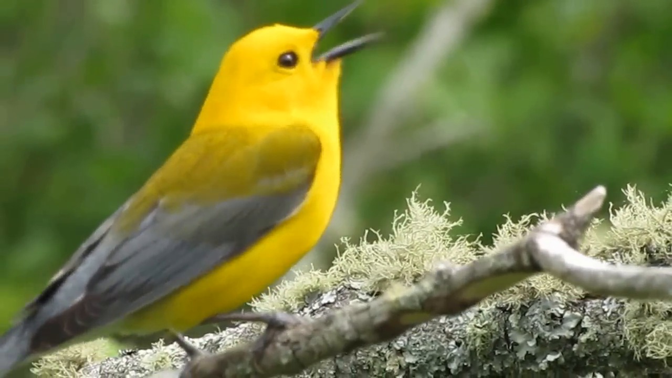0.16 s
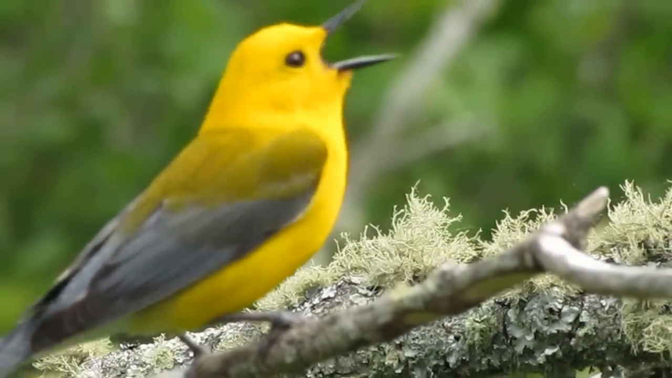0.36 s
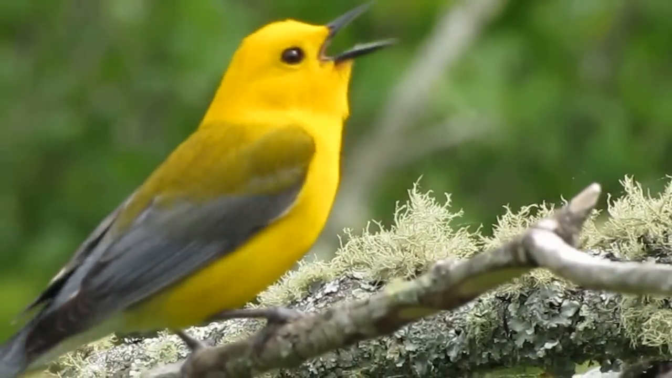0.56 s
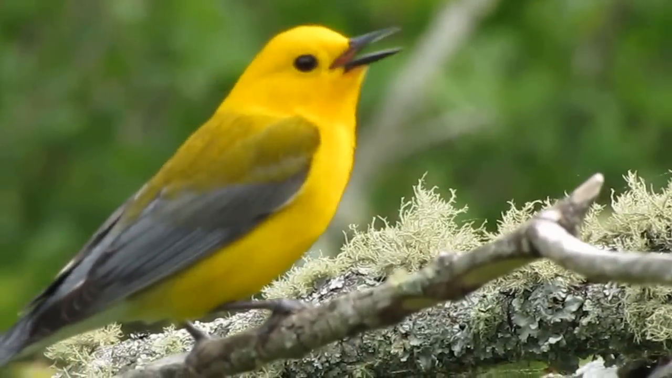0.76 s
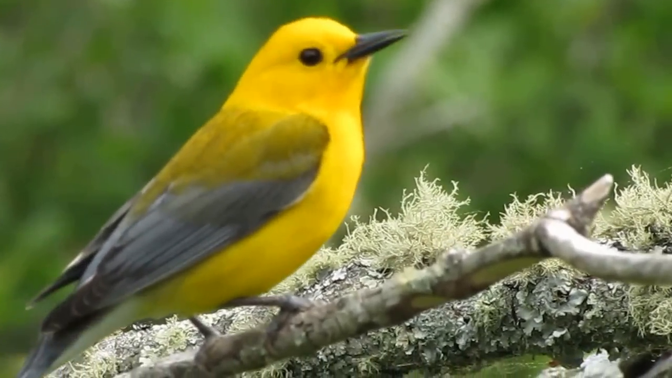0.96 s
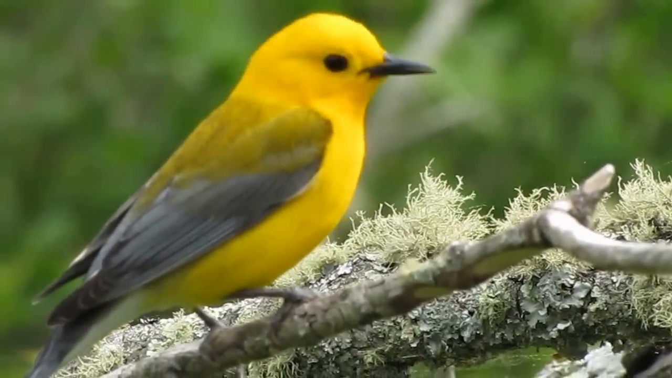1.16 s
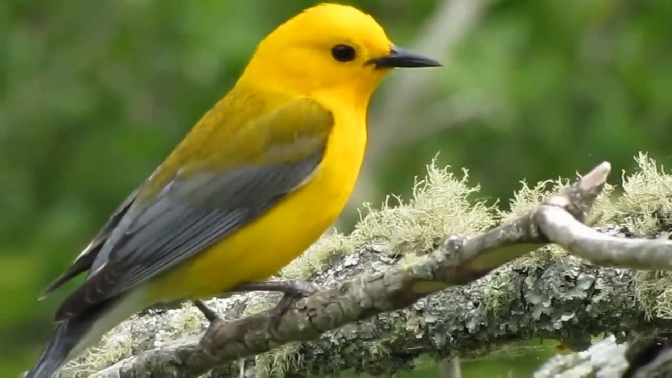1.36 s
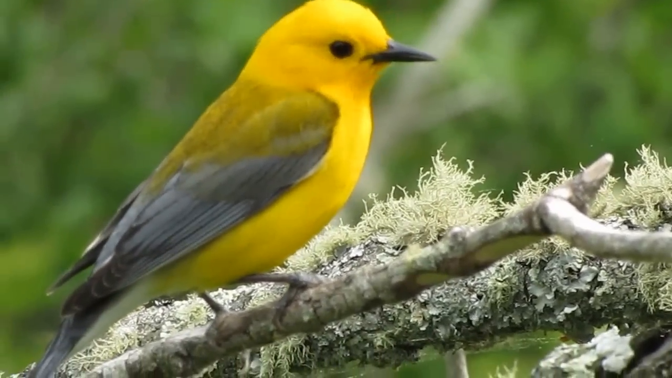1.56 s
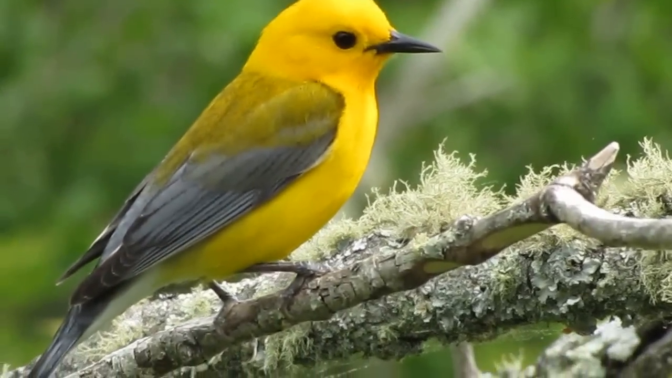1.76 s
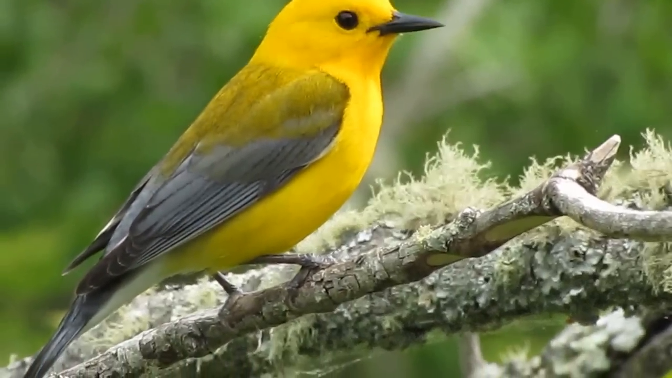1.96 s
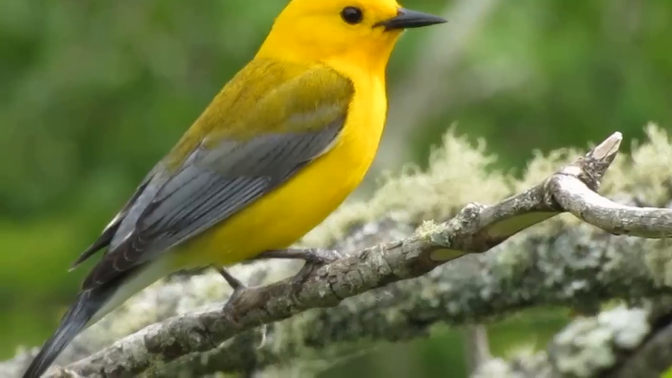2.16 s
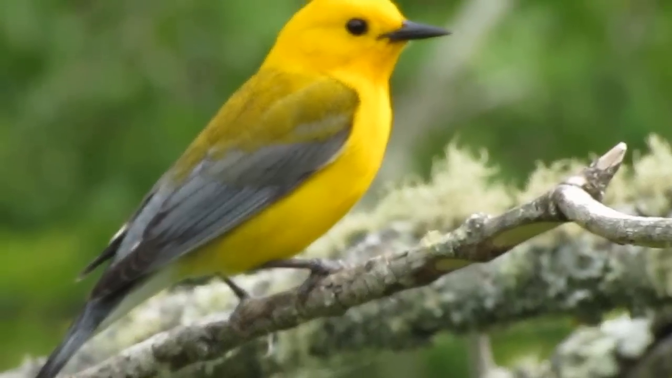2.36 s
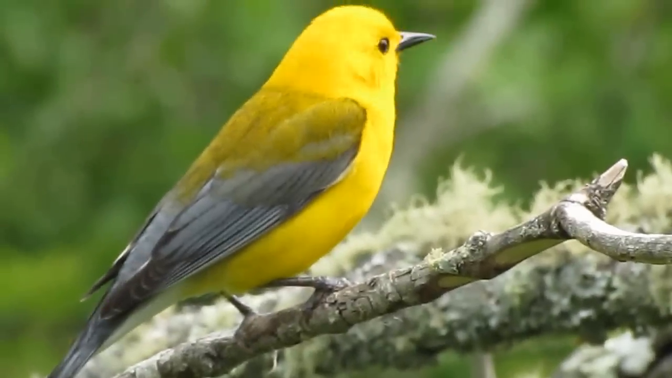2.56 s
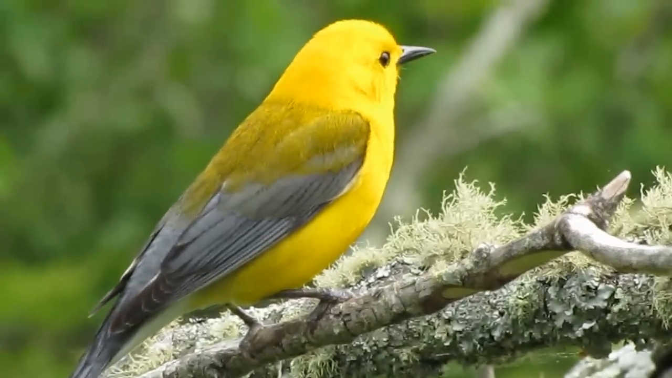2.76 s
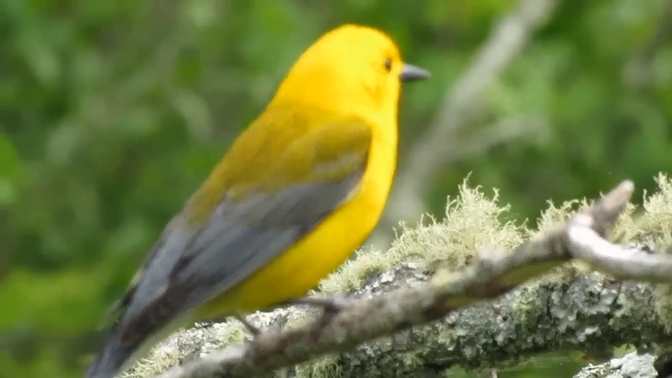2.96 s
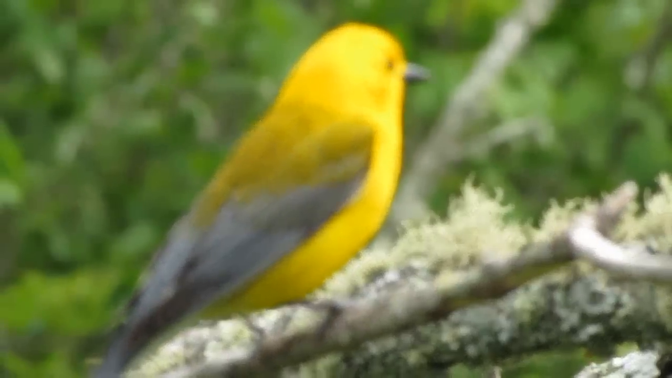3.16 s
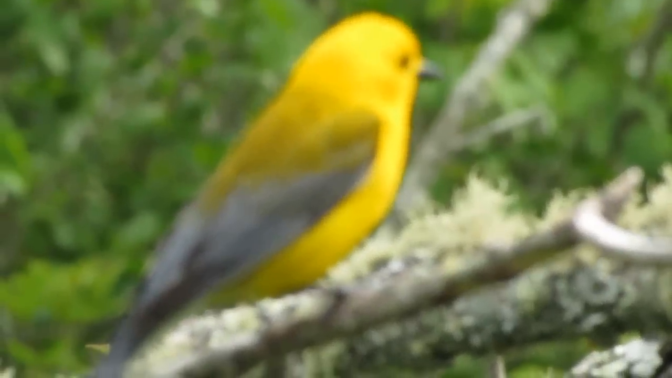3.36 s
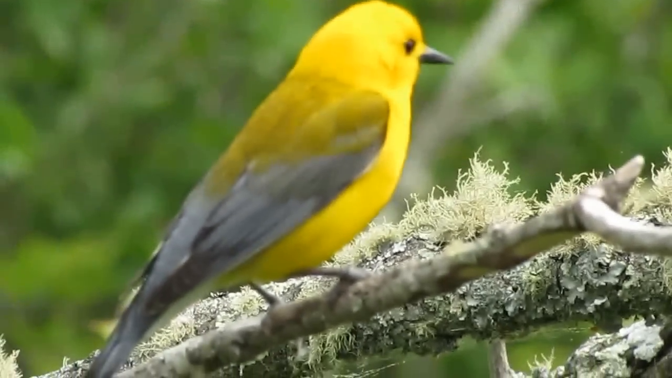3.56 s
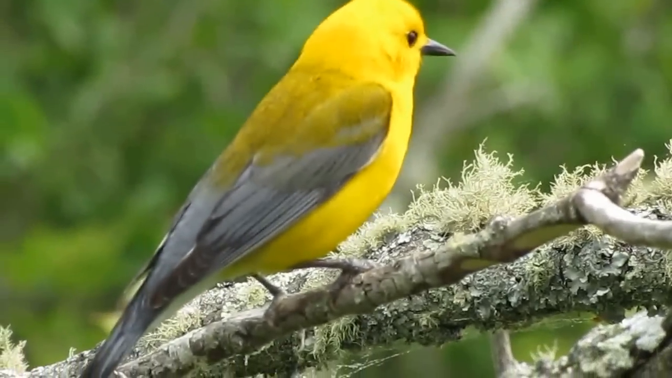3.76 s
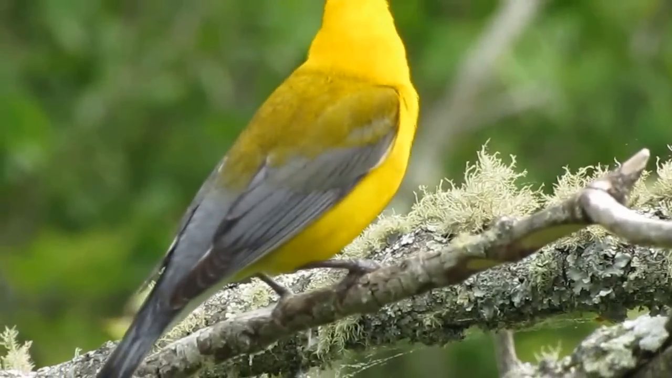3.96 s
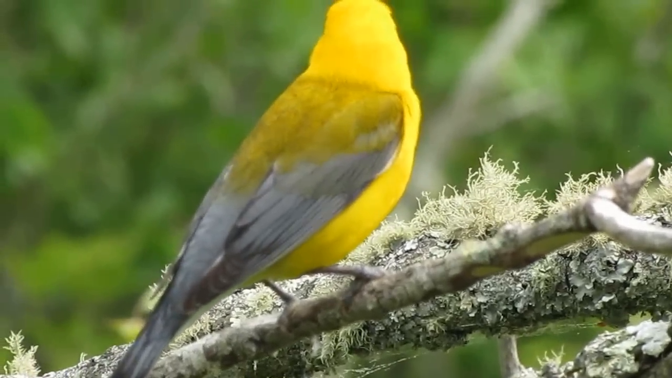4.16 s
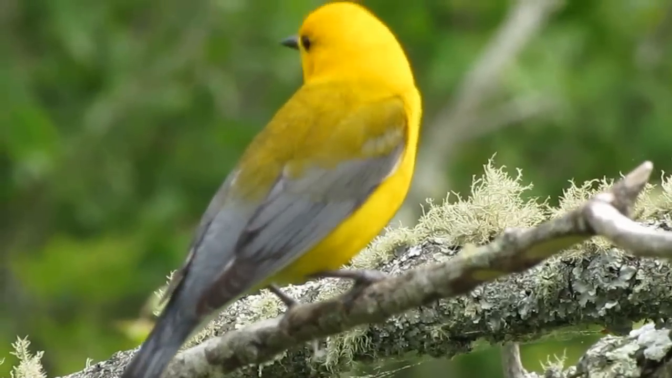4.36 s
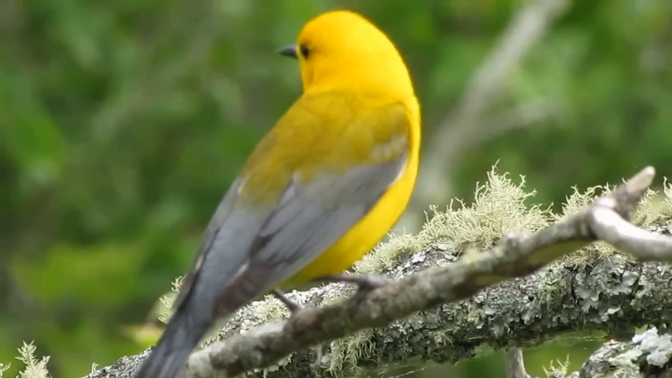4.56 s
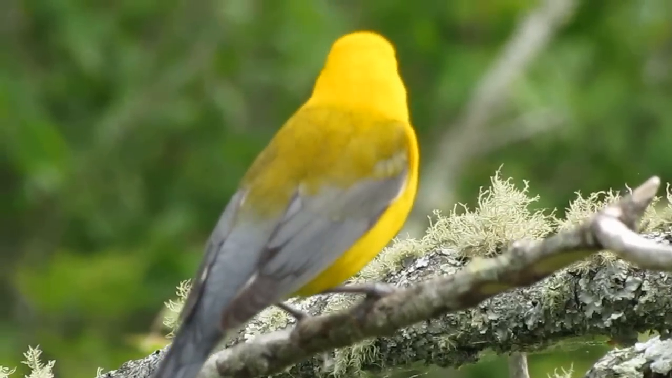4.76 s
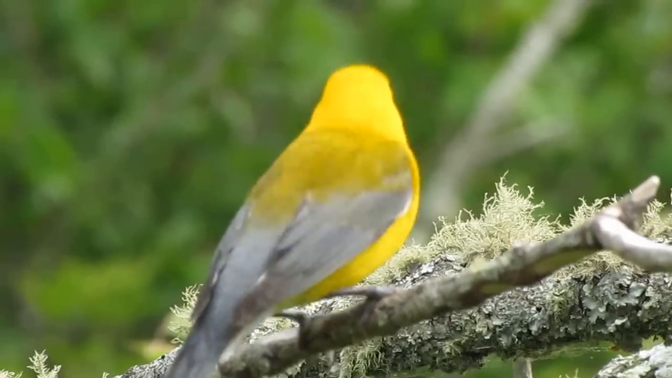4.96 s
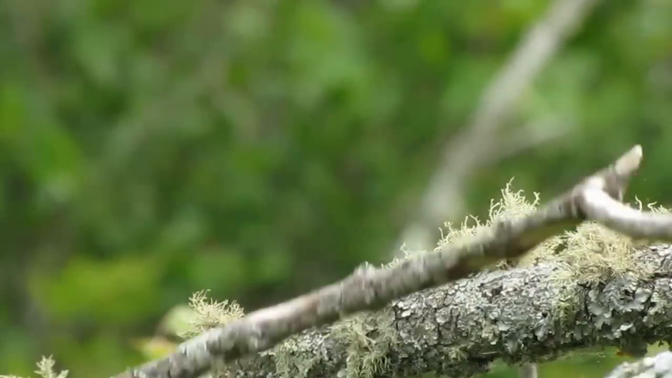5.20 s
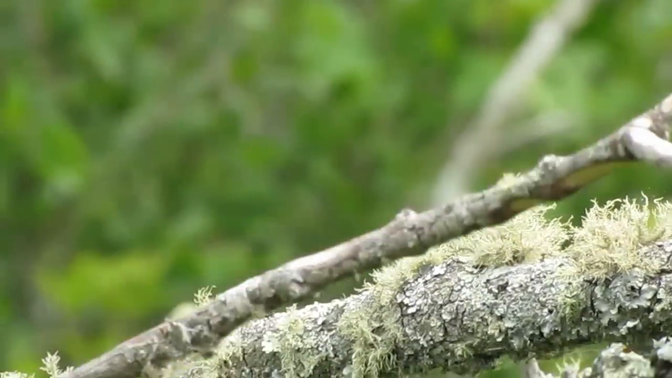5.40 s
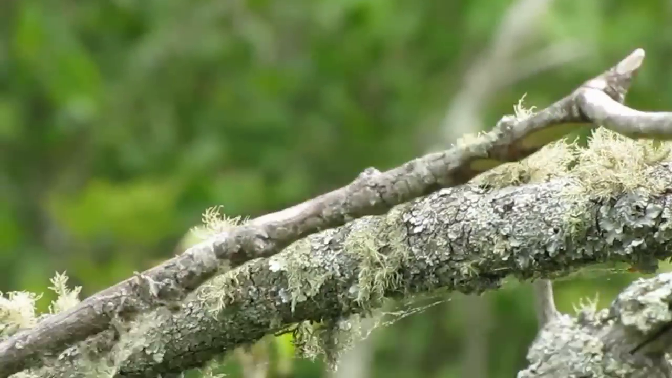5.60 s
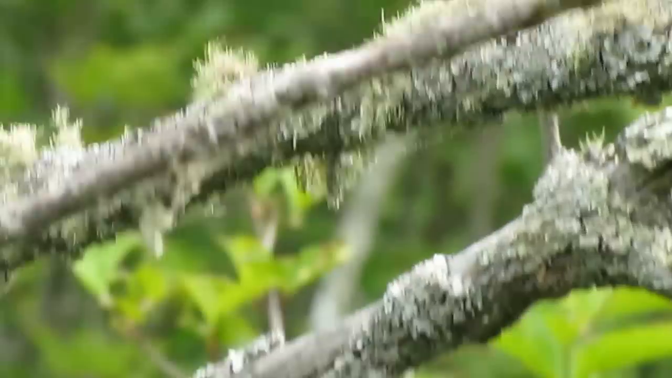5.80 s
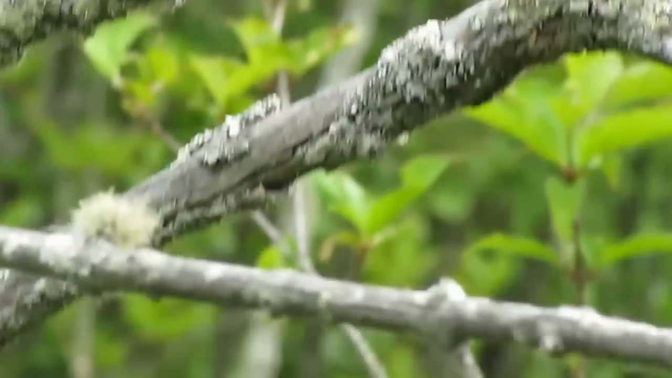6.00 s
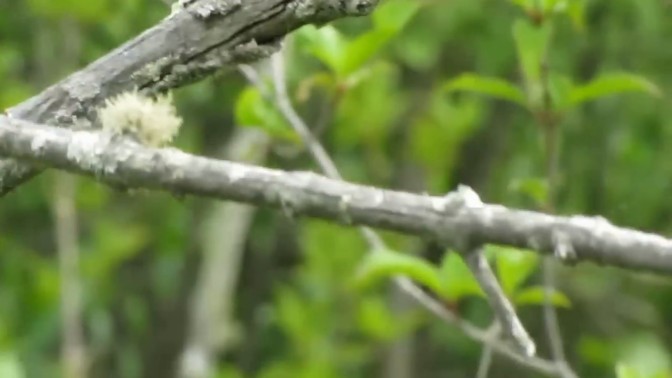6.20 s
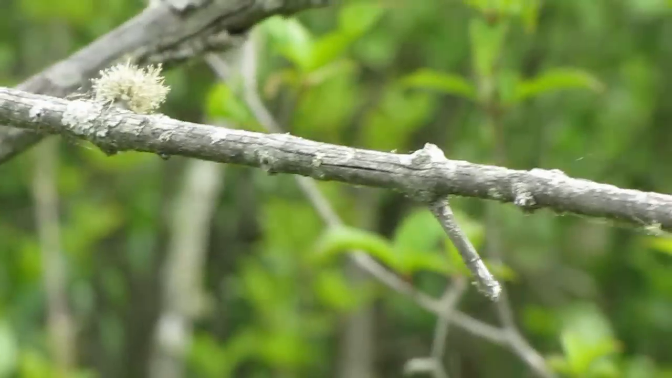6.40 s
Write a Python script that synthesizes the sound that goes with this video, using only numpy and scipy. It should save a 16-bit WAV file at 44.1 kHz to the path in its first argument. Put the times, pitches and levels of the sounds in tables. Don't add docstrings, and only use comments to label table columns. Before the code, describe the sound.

A close small songbird finishes a loud ringing run of upward-sliding notes, echoing in trees, then faint distant birds, low rumble and handling knocks.

```python
import sys
import numpy as np
from scipy import signal
from scipy.fft import rfft, irfft, next_fast_len
from scipy.io import wavfile
from scipy.ndimage import uniform_filter1d, map_coordinates

SR = 44100
rng = np.random.default_rng(int(sys.argv[2]) if len(sys.argv) > 2 else 0)


def wrap_up_sound(samples):
    columns = np.atleast_2d(samples).T
    tamed = np.clip(columns, -1, 1)
    steps = np.round(tamed * 32767).astype(np.int16)
    wavfile.write(sys.argv[1], SR, steps)


def elevation(decibels):
    levels = np.asarray(decibels, float)
    return 10 ** (levels / 20)


N = 284004
LEAD = SR // 4


def unit(x):
    return x / np.sqrt(np.mean(x ** 2) + 1e-20)


def along(points, hz):
    f, v = np.transpose(points)
    return np.interp(np.log(hz + 1), np.log(f + 1), v)


def wobble(rate, size=N):
    knots = rng.standard_normal(int(size * rate / SR) + 4)
    return map_coordinates(knots, [np.arange(size) * rate / SR])


def bell(s, width):
    return np.exp(-((np.arange(N) / SR - s) / width) ** 2)


def band_noise(low_hz, high_hz, size):
    band = signal.butter(2, [low_hz, high_hz], "band", fs=SR, output="sos")
    return unit(signal.sosfilt(band, rng.standard_normal(size)))


# (frequency [Hz], correlation [-1 to 1])
PORT_LIKENESS = [(25, 1), (60, 1), (140, 0.99), (310, 0.98), (710, 0.84), (1630, 0.42), (3730, .02),
                 (8510, -.18), (14000, -0.22)]


def rush(spectrum, alike=PORT_LIKENESS):
    patchy_db = 1.0
    _, _, z = signal.stft(rng.standard_normal((2, N + 4096)), SR, nperseg=512)
    field = uniform_filter1d(rng.standard_normal(z.shape[1:]), size=6, axis=0)
    field = uniform_filter1d(field, size=14, axis=1)
    patchy = signal.istft(z * elevation(patchy_db * unit(field)), nperseg=512)[1]
    pair = rfft(patchy, next_fast_len(N + 8192))
    hz = np.linspace(0, SR / 2, pair.shape[1])
    turn = np.arccos(np.clip(along(alike, hz), -1, 1)) / 2
    mid, side = irfft(pair * elevation(along(spectrum, hz)) * [np.cos(turn), np.sin(turn)])[:, :N]
    return unit(np.array([mid + side, mid - side]))


def camera_gain_db():
    held_db, freed_s, recovery_s = -8, 0.83, 1.0
    since_freed = np.clip(np.arange(N) / SR - freed_s, 0, None)
    return held_db * np.exp(-since_freed / recovery_s)


# (frequency [Hz], level [dB per Hz])
TRAFFIC_SPECTRUM = [(26, -30.5), (45, -2), (125, -1), (157, -3.5), (256, -7.5), (371, -11), (405, -12.5),
                    (527, -17.5), (1120, -22.5), (1380, -29), (2230, -40), (3000, -37), (3900, -65),
                    (6600, -120)]


def traffic():
    level_db = -38 + 2 * bell(5.1, width=.45)
    level_db = camera_gain_db() + level_db + 3.5 + 0.23 * wobble(5.4)
    return elevation(level_db) * rush(TRAFFIC_SPECTRUM) * elevation([[.6], [-.6]])


# (frequency [Hz], level [dB per Hz])
BUFFET_SPECTRUM = [(7.1, -33), (12, 1.5), (120, -14), (160, -32.5), (260, -120)]
# (centre time [s], width [s], level over the breeze [dB])
GUSTS = [
    (.86, 0.099, 7.5),
    (1.55, .14, 10.5),
    (1.95, 0.22, 4.5),
    (2.9, .12, 1),
    (3.35, .12, 0.5),
    (5.03, 0.086, 14.5),
    (5.5, .1, -2),
]


def wind():
    breeze_db = -43.5
    level_db = breeze_db + sum(db * bell(s, width) for s, width, db in GUSTS)
    level_db = .3 * camera_gain_db() + level_db + 3 + 1.5 * wobble(7)
    return elevation(level_db) * rush(BUFFET_SPECTRUM, alike=[(30, .4)]) * elevation([[.6], [-.6]])


# (frequency [Hz], level [dB per Hz])
LEAF_SPECTRUM = [(900, -27.5), (1500, -3), (2300, -4), (4850, -6.5), (5700, -8), (8000, -15),
                 (10000, -22.5), (13000, -36.5)]


def leaves():
    return elevation(0.78 * camera_gain_db() - 49.5 + 0.39 * wobble(8)) * rush(LEAF_SPECTRUM)


# (frequency [Hz], level [dB per Hz])
CLOTH_SPECTRUM = [(4000, -20), (7000, -1.5), (10000, 1), (13000, -3.5), (16000, -9), (17000, -61.5)]
# (time [s], length [s], level over the hiss [dB])
RUSTLES = [
    (5.012, 0.28, 6.5),
    (6.237, .25, 5),
]


def cloth():
    t = np.arange(N) / SR
    rise_s, fall_s = .03, .12
    level_db = -71.5
    for s, length, db in RUSTLES:
        ramps = np.minimum((t - s) / rise_s, 1 + (s + length - t) / fall_s)
        level_db = level_db + db * np.clip(ramps, 0, 1)
    return elevation(1.1 * camera_gain_db() + level_db + 5.5 + .7 * wobble(7.3)) * rush(CLOTH_SPECTRUM)


def add(track, rows, overtones=(), rough_db=3.0, flutter_hz=0, shape=None):
    s, hz, db = np.transpose(rows)
    t = np.arange(s[0], s[-1], 1 / SR)
    glide = uniform_filter1d(np.interp(t, s, hz), size=110, mode="nearest")
    glide = glide + flutter_hz * wobble(300, size=len(t))
    phase = 2 * np.pi * np.cumsum(glide) / SR
    level_db = np.interp(t, s, db)
    reedy_db = np.clip(-.8 * (level_db - db.max()), 0, 17)
    tone = np.sin(phase)
    for multiple, d in overtones:
        audible = multiple * glide < SR / 2.2
        tone = tone + elevation(d + reedy_db) * np.sin(multiple * phase) * audible
    edges = np.clip(np.minimum(t - s[0], s[-1] - t) / 0.0015, 0, 1)
    gain = elevation(level_db + 6.5 + rough_db * wobble(400, size=len(t))) * edges
    if shape is not None:
        gain = gain * shape(t)
    track[LEAD + round(s[0] * SR):][:len(t)] += tone * gain


# (frequency [Hz], time to fall 60 dB [s])
WOOD_DECAY = [(2000, .55), (5000, 0.91), (9000, 0.75)]


def trees(x, slow, alike):
    hz, t, z = signal.stft(rng.standard_normal((2, SR)), SR, nperseg=256)
    decay_s = slow * along(WOOD_DECAY, hz)[:, None]
    a, b = signal.istft(z * elevation(-60 * t / decay_s), SR, nperseg=256)[1]
    tail = np.array([a, alike * a + np.sqrt(1 - np.clip(alike, -1, 1) ** 2) * b])
    first, last = np.flatnonzero(x)[[0, -1]]
    wet = signal.fftconvolve(x[None, first:last], tail / np.linalg.norm(a), axes=1)
    return np.pad(wet, ((0, 0), (first + SR // 300, len(x))))[:, LEAD:LEAD + N]


# (time from phrase start [s], pitch [Hz], level [dB])
HIGH_STROKE = [(0, 6250, -3), (.014, 6330, 0), (.034, 7350, -6), (.05, 7500, -9), (.075, 6350, -3),
               (.1, 6400, -5), (.13, 7000, -8), (.16, 6400, -10)]
LOW_STROKE = [(.118, 3900, -2), (.135, 4800, -3), (.16, 5750, -2), (.19, 5700, -4), (.22, 4850, -4),
              (.25, 5650, -5), (.29, 5000, -10)]
# (time [s], high stroke level [dB], low stroke level [dB])
RIVAL_PHRASES = [
    (2.02, -62, -85),
    (2.24, -56.5, -56),
    (2.469, -54, -55.5),
    (2.695, -54, -53.5),
    (2.915, -54, -54),
    (3.125, -54.5, -55),
    (3.34, -56, -70),
]


def rival():
    out = np.zeros((2, N))
    for s, high_db, low_db in RIVAL_PHRASES:
        phrase = np.zeros(N + SR)
        add(phrase, np.array(HIGH_STROKE) + [s, 0, high_db - 1.5], rough_db=4, flutter_hz=60)
        add(phrase, np.array(LOW_STROKE) + [s, 0, low_db - 1.5], rough_db=4, flutter_hz=60)
        out += elevation(-4.5) * phrase[LEAD:LEAD + N] + elevation(2) * trees(phrase, slow=1.5, alike=.2)
    return out


# (time [s], centre pitch [Hz], level [dB])
TRILL = [(1.92, 5180, -57), (1.98, 4560, -52.5), (2.044, 3950, -52), (2.1, 3050, -53), (2.12, 3000, -61)]


def trill():
    chips = np.zeros(N + SR)
    s, centre_hz, db = np.transpose(TRILL)
    for at in np.arange(s[0], s[-1], .0158):
        hz, level = np.interp(at, s, centre_hz), np.interp(at, s, db)
        slide = [(at, hz + 200, level - 5), (at + .004, hz, level), (at + .010, hz - 400, level - 11)]
        add(chips, slide, rough_db=2.5, flutter_hz=30)
    direct = (chips * elevation([[-2.2], [2.2]]))[:, LEAD:LEAD + N]
    return direct + elevation(-7) * trees(chips, slow=.8, alike=0.18)


def whistles(table, path, crest, rise_db, fall_db, haze, pan_db):
    sides, echo, u = np.zeros((2, N + SR)), np.zeros(N + SR), np.linspace(0, 1, 41)
    swell_db = np.interp(u, [0, np.clip(crest, .01, .99), 1], [-rise_db, 0, -fall_db])
    for s, length, first_hz, second_hz, db in table:
        call = np.zeros(N + SR)
        hz = first_hz + (second_hz - first_hz) * path(u)
        rows = np.transpose([s + length * u, hz, db + swell_db])
        add(call, rows, [(3, -36)], rough_db=.5 + 4.5 * haze, flutter_hz=140 * haze)
        sides += call * elevation([[pan_db - 3 * haze], [-pan_db - 3 * haze]])
        echo += call * elevation(5.2 * haze)
    return np.vstack([sides, echo])


# (time [s], length [s], first pitch [Hz], second pitch [Hz], peak level [dB])
STRAIGHT = [
    (5.655, .155, 2200, 3310, -41.5),
    (5.815, .035, 3155, 2250, -42.5),
    (5.808, .006, 3330, 4000, -50),
    (4.375, .045, 2110, 2260, -52),
    (4.455, .025, 3200, 2300, -56),
    (4.88, .04, 2170, 2280, -49),
    (5.22, .045, 1030, 1000, -47),
]
SETTLING = [
    (1.835, .052, 2943, 2230, -53.5),
    (1.904, .082, 2420, 2320, -54.5),
    (2.003, .006, 2520, 2630, -56),
    (1.983, .022, 2320, 2520, -57),
    (1.4, 0.039, 3900, 3100, -65),
    (2.11, .05, 2320, 2450, -56),
    (1.635, 0.0267, 2680, 2190, -54),
]
SWELLING = [
    (1.3, 0.16, 4540, 4390, -56),
    (2.15, 0.053, 3520, 2730, -55),
    (3.57, .08, 4740, 3850, -53.5),
    (4.92, .1, 8000, 8430, -64.5),
]
FAR_ARCHES = [
    (.948, 0.029, 3900, 4800, -59),
    (1.112, 0.031, 3930, 4800, -58),
    (1.535, .045, 2260, 3050, -53),
    (1.555, .03, 4600, 5000, -61),
    (1.612, .04, 6950, 6400, -59.5),
    (1.69, .05, 2870, 3900, -56),
]
BLURRED = [
    (.58, 0.096, 2970, 2610, -56.5),
    (.735, 0.24, 2516, 3047, -60.5),
    (1.07, .19, 5800, 4750, -63),
    (3.55, 0.042, 6740, 7450, -54),
    (1.49, .08, 4450, 4450, -63),
    (5.2, .1, 8000, 8100, -67),
]
ARCHES = [
    (1.261, .016, 4000, 4550, -52.5),
    (1.415, 0.0146, 4600, 5070, -59),
    (1.58, .03, 2470, 2960, -52),
    (1.61, 0.031, 2450, 2670, -53),
    (1.69, 0.022, 2190, 2400, -57),
    (1.885, 0.0207, 2284, 2945, -54),
]
CHIPS = [
    (1.033, 0.021, 8300, 7030, -47.5),
    (5.431, 0.019, 9660, 8050, -44),
]


def far_whistles():
    calls = whistles(STRAIGHT, lambda u: u,
                     crest=.65, rise_db=13, fall_db=5, haze=.04, pan_db=-3)
    calls += whistles(SETTLING, lambda u: 1 - (1 - u) ** 1.7,
                      crest=.45, rise_db=2.5, fall_db=2.5, haze=.08, pan_db=-.7)
    calls += whistles(SWELLING, lambda u: 1 - (1 - u) ** 1.6,
                      crest=.75, rise_db=14, fall_db=4, haze=.25, pan_db=.3)
    calls += whistles(FAR_ARCHES, lambda u: np.sin(3 * np.pi * u) ** 2,
                      crest=.45, rise_db=3, fall_db=4, haze=.7, pan_db=.3)
    calls += whistles(BLURRED, lambda u: 1 - (1 - u) ** 3.2,
                      crest=.35, rise_db=4, fall_db=8, haze=.5, pan_db=.7)
    calls += whistles(ARCHES, lambda u: np.sin(np.pi * u),
                      crest=.45, rise_db=2.5, fall_db=2.5, haze=.15, pan_db=-.7)
    calls += whistles(CHIPS, lambda u: 1 - np.exp(-u / .13),
                      crest=.35, rise_db=12, fall_db=16, haze=.4, pan_db=.3)
    return calls[:2, LEAD:LEAD + N] + elevation(-7) * trees(calls[2], slow=.8, alike=0.18)


# (time [s], peak level [dB], centre [Hz], level of the top end [dB])
TICKS = [(2.5354, -43, 7000, -22), (2.6204, -39, 7000, -25), (3.0494, -53, 8500, -3),
         (4.0847, -38, 4800, -28), (4.6332, -42, 2690, -16), (4.777, -36, 3300, -29),
         (4.8454, -33, 2000, -24), (5.218, -38, 2560, -15), (5.4335, -45, 7000, -19.5),
         (5.7243, -39, 3200, -29.5), (6.0252, -35, 3800, -25.5), (6.0606, -40, 2850, -26)]
# (time [s], peak level [dB], pitch [Hz])
KNOCKS = [
    (1.897, -40, 616),
    (2.61, -35, 860),
    (2.971, -41, 725),
    (4.845, -31, 1080),
    (5.431, -27, 830),
    (5.579, -26.5, 1025),
    (6.287, -29, 606),
]


def handling():
    out, t = np.zeros(N + SR), np.arange(SR // 20) / SR
    for s, db, hz, top_db in TICKS:
        body = band_noise(0.5 * hz, 1.5 * hz, len(t))
        top = band_noise(7000, 13000, len(t))
        tick = elevation(db - 4.5 - 60 * t / 0.015) * (body + elevation(top_db + 2.5) * top)
        out[round(s * SR):][:len(t)] += tick
    for s, db, hz in KNOCKS:
        shell = np.sin(2 * np.pi * hz * t)
        shell += 0.49 * np.sin(2 * np.pi * 1.46 * hz * t) * elevation(-60 * t / 0.034)
        shell += .5 * elevation(-60 * t / 0.013) * band_noise(900, 3500, len(t))
        onset = 1 - np.exp(-t / 0.00057)
        out[round(s * SR):][:len(t)] += elevation(db + 3.5 - 60 * t / 0.022) * onset * shell
    return out[:N] * elevation([[1.5], [-1.5]])


# (time from its start [s], pitch [Hz])
FIRST_CLIMB = [(0, 2850), (.007, 3100), (.016, 3270), (.030, 3870), (.041, 4130), (.065, 5880)]
SECOND_CLIMB = [(.099, 5950), (.111, 6430), (.134, 8300), (.143, 7500)]
# (frequency [Hz], level [dB])
BEAK = [(3100, -31), (3620, -23), (4150, -18), (4550, -11.5), (5100, -10.5), (5900, -13.5), (6500, -11),
        (7700, -12)]


def syllable():
    (crest_s, crest_hz), (rim_s, rim_hz) = FIRST_CLIMB[-1], SECOND_CLIMB[0]
    end_s, step_s = SECOND_CLIMB[-1][0], .0005
    t = np.arange(0, end_s, step_s)
    bowl_s, bowl_hz, bowl_steep = .0835, 4270, 2.6
    wall = np.interp(t, [crest_s, bowl_s, rim_s], [1, 0, 1])
    hz = np.interp(t, *np.transpose(FIRST_CLIMB + SECOND_CLIMB))
    hz = bowl_hz + (hz - bowl_hz) * wall ** bowl_steep
    round_s = .003
    hz = uniform_filter1d(hz, size=round(round_s / step_s), mode="nearest")
    attack_db = -20 * np.clip(1 - t / .008, 0, 1)
    release_db = -40 * np.clip(1 - (end_s - t) / .015, 0, 1) ** 2
    slump_width_s = .008
    slump_db = -3 * np.exp(-((t - crest_s - slump_width_s) / slump_width_s) ** 2)
    return np.transpose([t, hz, along(BEAK, hz) + attack_db + release_db + slump_db])


# (time from note start [s], pitch [Hz], level [dB])
OTHER_SIDE = [(.025, 4200, -36), (.029, 4450, -20), (.045, 4680, -17), (.048, 4600, -36)]
# (time [s], stretch [ratio], pitch [ratio], other side level [dB], tone break after the start [s])
NOTES = [
    (-.096, 1.014, 1.025, -10, .07),
    (.1267, 1.01, .995, -13, .072),
    (.346, 1.004, 1.008, 4.5, .068),
    (.564, 1.0, 1.0, -16, .0645),
]
# (multiple of the pitch [ratio], level [dB])
OVERTONES = [(2, -38), (3, -44), (4, -51)]
# (delay [s], level [dB])
TWIGS = [(.0007, -19), (.0016, -22), (.005, -24), (.013, -18.5)]
# (delay [s], level [dB])
GROUND_ECHOES = [(.011, -26), (.017, -26)]


def warbler():
    song_db = -3.2
    out = np.zeros((2, N))
    for s, stretch, pitch, other_db, snap in NOTES:
        note = np.zeros(N + SR)

        def shape(t):
            dip = 1 - .75 * np.exp(-((t - s - snap) / .0006) ** 2)
            rasp = elevation(.45 * wobble(2200, size=len(t)))
            both = np.interp(t - s, np.array(OTHER_SIDE)[:, 0] - [0, 0, 0, .002], [0, 1, 1, 0])
            return dip * rasp * elevation(-both * 2.2 * max(other_db + 0.5, 0))

        main = syllable() * [stretch, pitch, 1] + [s, 0, song_db]
        add(note, main, OVERTONES, rough_db=1.1, flutter_hz=33, shape=shape)
        other = np.array(OTHER_SIDE) + [s, 0, min(other_db, -3.5)]
        add(note, other, [(2, -27 + other_db), (3, -45 + other_db)], rough_db=2.5, flutter_hz=40)
        near = sum(elevation(d) * np.roll(note, round(lag * SR)) for lag, d in TWIGS)
        ahead = sum(elevation(d) * np.roll(note, round(lag * SR)) for lag, d in GROUND_ECHOES)
        out += (note + ahead + near * [[1], [-1]])[:, LEAD:LEAD + N]
        out += elevation(-24) * trees(np.roll(note, SR // 150), slow=.3, alike=.3)
        out += elevation(-22) * trees(note, slow=.68, alike=.04)
    return out


def scene():
    background = traffic() + wind() + leaves() + cloth()
    return background + rival() + trill() + far_whistles() + handling() + warbler()


def roll_off(x):
    return signal.sosfilt(signal.butter(12, 15830, fs=SR, output="sos"), x)


def record(dry):
    return roll_off(dry)


dry = scene()
out = record(dry)
wrap_up_sound(out)
```